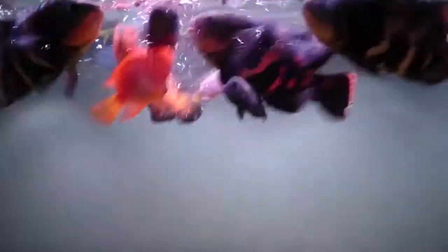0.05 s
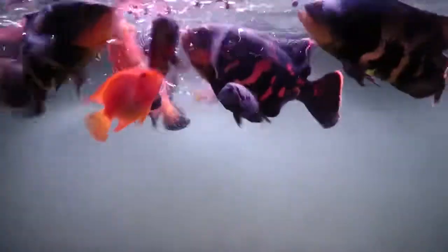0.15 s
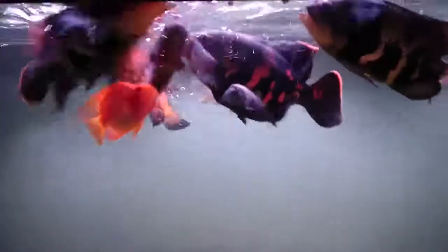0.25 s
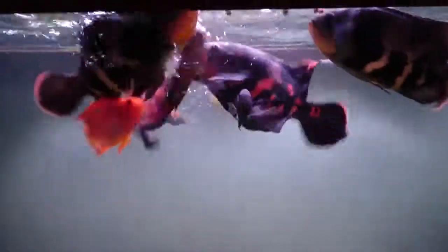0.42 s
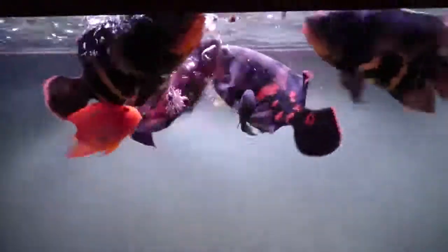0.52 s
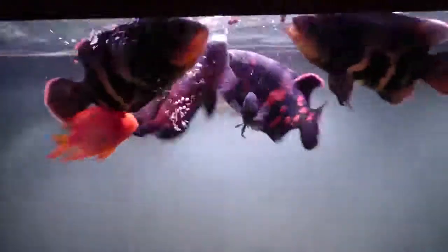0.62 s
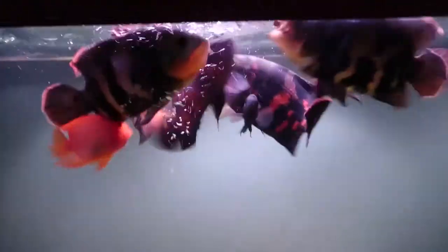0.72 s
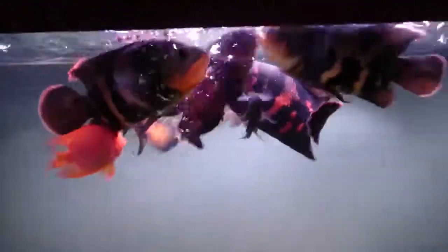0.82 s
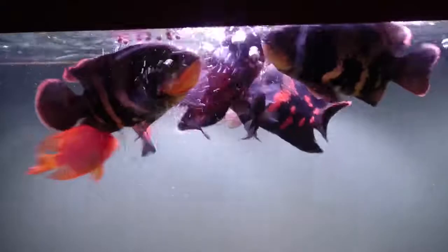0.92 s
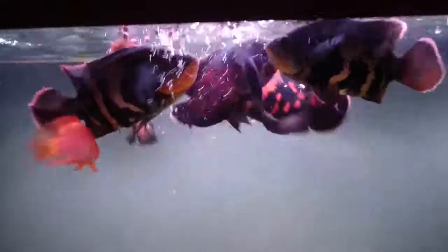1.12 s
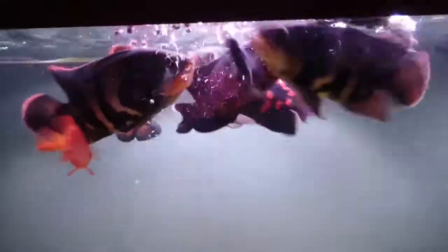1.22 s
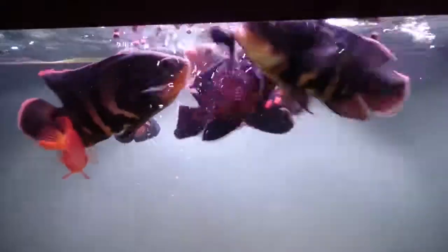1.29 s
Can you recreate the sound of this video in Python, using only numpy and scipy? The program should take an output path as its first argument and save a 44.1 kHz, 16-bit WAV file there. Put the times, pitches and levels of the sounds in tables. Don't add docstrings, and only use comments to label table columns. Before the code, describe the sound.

Fish splash and snap at an aquarium surface. Over quiet pump hiss and a faint dying echo, a plopping, bubbly slap cluster comes at 0.2 seconds, a brighter, sharper smack at 0.4, then a crisp, clicking snap with a high bubble blip at 0.8. Weak drips and small bubbles follow around 1.2-1.3. Each burst leaves a short hard-room tail; direct splashes lean right, while the echo is wide.

```python
import sys
import numpy as np
from scipy import signal
from scipy.fft import rfft, irfft, next_fast_len
from scipy.io import wavfile
from scipy.ndimage import map_coordinates

SR = 44100
rng = np.random.default_rng(int(sys.argv[2]) if len(sys.argv) > 2 else 0)


def materialize(psi):
    bounded = np.clip(np.atleast_2d(psi).T, -1, 1)
    quanta = np.round(bounded * 32767).astype(np.int16)
    wavfile.write(sys.argv[1], SR, quanta)


def voltage_ratio(level):
    return 10 ** (np.asarray(level, float) / 20)


N = 59535

# start in [s],
# level in [dB], spray centre in [Hz], length in [s], spread in [octaves].
SLAPS = [(0.195, -41.5, 4700, .015, 0.71), (0.207, -34.5, 1021, .008, 0.37),
         (0.212, -22.5, 2854, 0.011, 0.82), (0.2258, -24, 1990, 0.0043, 0.47),
         (.244, -27.5, 2856, 0.0098, 0.88), (.391, -29.5, 2160, 0.0078, 0.77),
         (0.3984, -13.5, 4377, 0.0035, 0.723), (.403, -23, 2697, .01, 0.899),
         (0.416, -27, 6850, .0045, 0.335), (0.426, -24, 3345, 0.0046, 0.48), (0.777, -31.5, 1346, 0.008, 1),
         (0.784, -30, 4340, 0.0096, 0.65), (0.7841, -20, 4000, .002, 0.59), (0.791, -31, 892, .006, .9),
         (0.801, -28.5, 3560, 0.0069, 0.754), (0.673, -54, 7190, 0.03, 0.092),
         (1.21, -52, 7670, .035, 0.12), (1.213, -50.5, 1450, 0.027, 0.28), (1.122, -52, 122.5, .03, 0.88),
         (1.2, -54.5, 3260, .025, 0.26), (1.249, -40.5, 1850, 0.01, 0.77),
         (1.2616, -30.5, 3860, 0.0016, 0.56), (1.264, -44, 2710, 0.018, 0.75)]
# start in [s], level in [dB], pitch in [Hz], t60 in [s].
BUBBLES = [(0.18, -27.5, 1682, 0.083), (.1865, -20.5, 1600, 0.02), (.198, -61, 1590, 0.026),
           (.208, -13.5, 870, 0.033), (.216, -26.5, 895, 0.091), (0.217, -38, 1770, 0.018),
           (.221, -19.5, 1292, 0.057), (.226, -14.5, 2077, 0.035), (0.398, -10.5, 3018, 0.029),
           (.402, -23.5, 856, 0.1), (.405, -22, 340.6, 0.026), (0.403, -12.5, 1604, 0.037),
           (.426, -11.5, 3180, 0.033), (.386, -56, 5110, 0.058), (.785, 1, 3320, 0.0076),
           (.793, -22.5, 848, 0.047), (.783, -28.5, 702.4, 0.05), (0.828, -3.5, 2540, 0.0083),
           (1.219, -37, 3250, 0.038), (1.226, -24.5, 3070, 0.033), (1.254, -30, 4162, 0.091),
           (1.256, -36, 648, 0.095), (1.29, -41, 662, 0.17), (1.267, -27.5, 1740, 0.046),
           (1.296, -33, 1520, 0.057)]
# frequency in [Hz], gain in [dB].
RIGHT_PORT = [(30, -15.5), (200, -13.5), (700, -2), (2800, -5), (3700, 2.82), (4050, -4.5), (4450, -7),
              (5700, -11.5)]
# frequency in [Hz], gain in [dB].
LEFT_OVER_RIGHT = [(150, -2), (400, -8.5), (2400, -17.5), (4200, -16.5), (4700, -44), (5000, -7), (5500, -0.63),
                   (15000, 2.6)]
# frequency in [Hz], correlation in [-1 to 1].
PORT_LIKENESS = [(60, -0.81), (700, -0.2), (1300, -0.38), (4400, 0.068)]
# frequency in [Hz], t60 in [s].
ROOM_T60 = [(200, 0.38), (800, 0.47), (2000, 0.45), (4000, 0.4), (8000, 0.33), (15000, 0.29)]
# frequency in [Hz], gain in [dB].
TREBLE = [(5700, -0.02), (7200, 3), (9000, -1.5), (10500, -4.5), (11200, -11), (12200, -7), (14600, -3),
          (15300, -5)]
# frequency in [Hz], gain in [dB].
LEFT_DIRECT = [(1000, -15), (4500, -33.5), (5300, 3.07)]
# frequency in [Hz], density in [dB per Hz].
LINGER_SPECTRUM = [(300, -23), (1500, -10), (3500, -4.5), (8000, -21), (15000, -35)]
# frequency in [Hz], density in [dB per Hz].
PUMP_SPECTRUM = [(30, 6), (70, -1), (300, -2.5), (800, -2.1), (2000, 0), (3600, -5.5), (7000, -13),
                 (15000, -20)]
# time in [s], level in [dB].
PUMP_DRIFT = [(0, .1), (.7, .3), (1.35, -1.5)]

LINGER_DB, PUMP_DB, PUMP_SWAY_DB = -57.5, -48, 0.5
PITCH_RISE_PER_S, SOFT_START_S = 0.4, 0.002
SPRAY_LIFE_CYCLES, SPRAY_SCATTER_DB, PUFF_OVER_SPRAY_DB = 2.76, 2.5, 1
ROOM_DB, ROOM_GAP_S, BUBBLE_ROOM_DB, LEFT_LAG_S = 0.5, 0.0028, -2.5, 0.0003
TOP_HZ = 15600


def along(points, hz):
    f, v = np.transpose(points)
    return np.interp(np.log(hz + 1), np.log(f + 1), v)


def coloured(x, points):
    size = 2 * next_fast_len(N // 2 + 8192)
    gain = voltage_ratio(along(points, np.fft.rfftfreq(size, 1 / SR)))
    cepstrum = irfft(np.log(gain), size)
    cepstrum[1:size // 2] *= 2
    cepstrum[size // 2 + 1:] = 0
    return irfft(rfft(x, size) * np.exp(rfft(cepstrum)), size)[..., :N]


def diffuse_pair(seconds, t60=None):
    noise = rng.standard_normal((2, int(seconds * SR) + 256))
    hz, t, z = signal.stft(noise, SR, nperseg=256)
    like = np.clip(along(PORT_LIKENESS, hz), -1, 1)[:, None]
    left = like * z[1] + np.sqrt(1 - like ** 2) * z[0]
    z = np.array([left, z[1]])
    if t60:
        z = z * voltage_ratio(-60 * t / along(t60, hz)[:, None])
    x = signal.istft(z, SR, nperseg=256)[1]
    return x / np.linalg.norm(x[1])


def add(track, start_s, sound):
    part = track[round(start_s * SR):][:len(sound)]
    part += sound[:len(part)]


def lingering():
    echo = coloured(diffuse_pair(N / SR, ROOM_T60)[:, :N], LINGER_SPECTRUM)
    return voltage_ratio(LINGER_DB) * echo / np.std(echo[1, :SR // 10])


def pump():
    s, db = np.transpose(PUMP_DRIFT)
    hiss = coloured(diffuse_pair(N / SR)[:, :N], PUMP_SPECTRUM)
    sway = map_coordinates(rng.standard_normal(20), [np.arange(N) * 9 / SR])
    level_db = np.interp(np.arange(N) / SR, s, db) + PUMP_DB + PUMP_SWAY_DB * sway
    return voltage_ratio(level_db) * hiss / np.std(hiss[1])


def bubbles():
    out, t = np.zeros(N), np.arange(SR // 6) / SR
    soft_start = 1 - np.exp(-t / SOFT_START_S)
    for start_s, db, hz, t60_s in BUBBLES:
        phase = 2 * np.pi * (hz * (t + PITCH_RISE_PER_S * t ** 2 / 2) + rng.random())
        decay = voltage_ratio(db - 60 * t / t60_s)
        add(out, start_s, decay * soft_start * np.sin(phase))
    return out


def spray_grains(hz, length_s, octaves, size, count=120):
    t = np.arange(SR // 40) / SR
    when, drop_size = rng.random(count), rng.exponential(size=count)
    pitch = np.clip(hz * 2 ** (octaves * rng.standard_normal(count)), 60, SR / 3)[:, None]
    life = t * pitch / (SPRAY_LIFE_CYCLES * max(1, 0.8 / octaves - 1))
    envelope = life * np.exp(-2 * life) * np.sqrt(pitch)
    grains = voltage_ratio(SPRAY_SCATTER_DB * drop_size)[:, None] * np.sin(2 * np.pi * pitch * t) * envelope
    first = (when ** 1.8 * 1.5 * length_s * SR).astype(int)
    place = first[:, None] + np.arange(len(t))
    return np.bincount(place.ravel(), grains.ravel(), size)[:size]


def puff_noise(hz, octaves, size):
    away = np.log2((np.fft.rfftfreq(size, 1 / SR) + 1) / hz) / octaves
    return irfft(rfft(rng.standard_normal(size)) * np.exp(-away ** 2 / 4), size)


def slaps():
    out, t = np.zeros(N), np.arange(SR // 8) / SR
    for start_s, db, hz, length_s, octaves in SLAPS:
        rise = 1 - np.exp(-t / (0.26 * length_s))
        spray = spray_grains(hz, length_s, octaves, len(t)) * rise
        puff = puff_noise(hz, octaves, len(t)) * rise * np.exp(-(t / length_s) ** 2)
        puff_part = voltage_ratio(PUFF_OVER_SPRAY_DB) * puff / np.linalg.norm(puff)
        mix = spray / np.linalg.norm(spray) + puff_part
        add(out, start_s, voltage_ratio(db) * mix * np.sqrt(length_s * SR))
    return out


def room(x):
    out, t = np.zeros((2, N)), np.arange(N) / SR
    for start_s, end_s in [(0, 0.3), (0.3, 0.6), (0.6, 1), (1, 2)]:
        tail = diffuse_pair(0.7, ROOM_T60)
        tail_t = np.arange(tail.shape[1]) / SR
        tail = tail * (1 - np.exp(-(tail_t / (2 * ROOM_GAP_S)) ** 2))
        burst = x * (t >= start_s) * (t < end_s)
        out += signal.fftconvolve(burst[None], tail, axes=1)[:, :N]
    return out


def scene():
    background = lingering() + pump()
    air, spray = bubbles(), slaps()
    blows = spray + air
    left = -coloured(np.roll(blows, round(LEFT_LAG_S * SR)), LEFT_DIRECT)
    direct = np.array([left, blows])
    return direct + voltage_ratio(ROOM_DB) * room(spray + voltage_ratio(BUBBLE_ROOM_DB) * air) + background


def low_pass(x):
    return signal.sosfilt(signal.butter(12, 16510, fs=SR, output="sos"), x)


def record(dry):
    ports = np.array([coloured(dry[0], LEFT_OVER_RIGHT), dry[1]])
    ports = coloured(coloured(ports, RIGHT_PORT), TREBLE)
    ports = irfft(rfft(ports) * (np.fft.rfftfreq(N, 1 / SR) < TOP_HZ), N)
    return low_pass(ports)


dry = scene()
out = record(dry)
materialize(out)
```